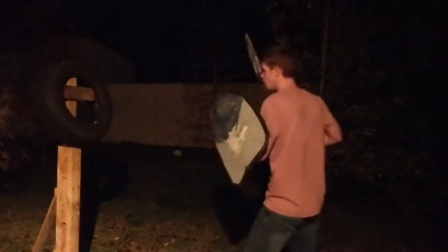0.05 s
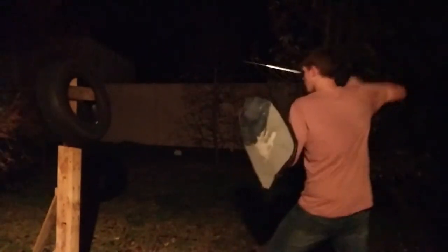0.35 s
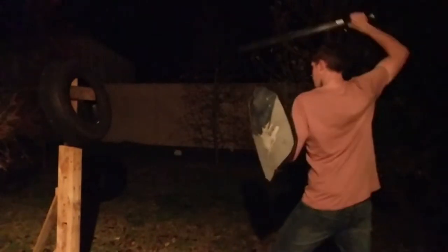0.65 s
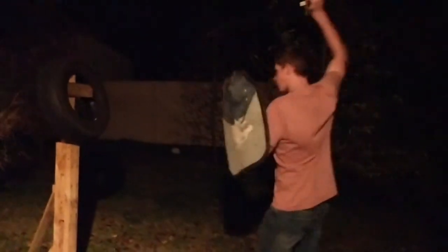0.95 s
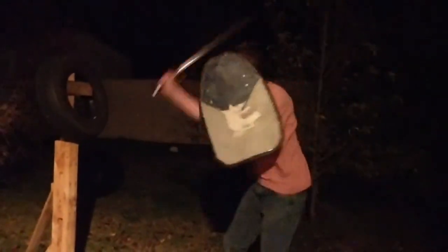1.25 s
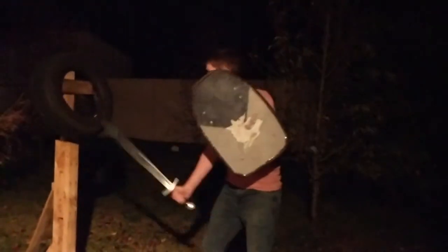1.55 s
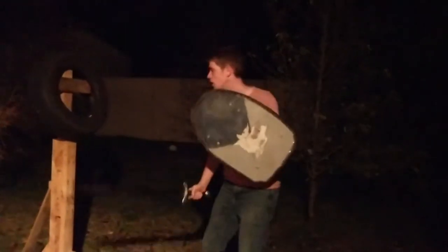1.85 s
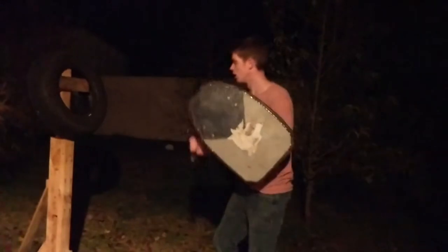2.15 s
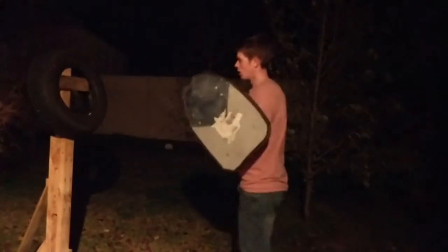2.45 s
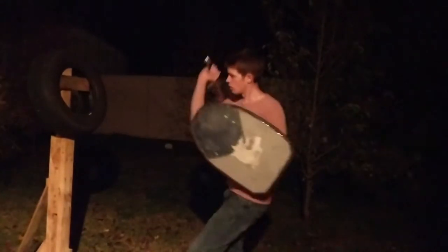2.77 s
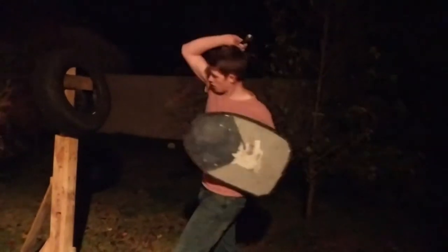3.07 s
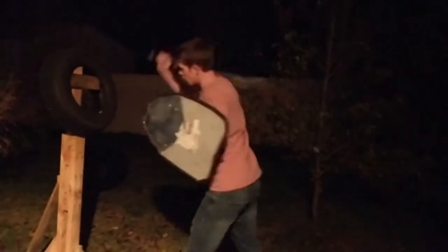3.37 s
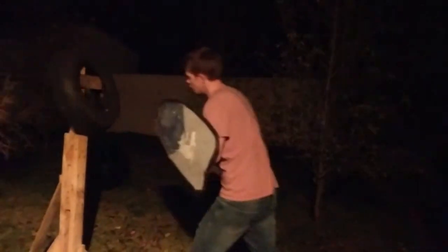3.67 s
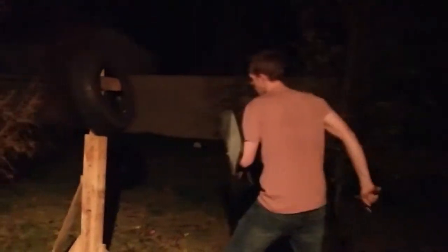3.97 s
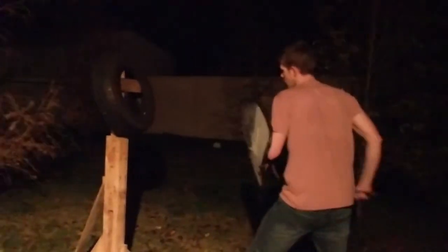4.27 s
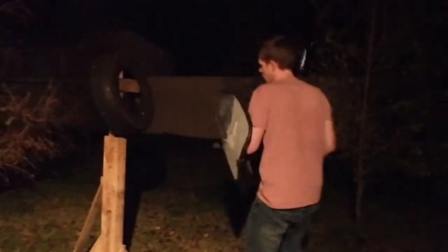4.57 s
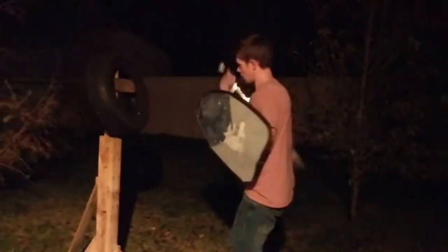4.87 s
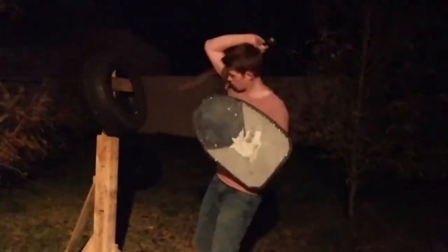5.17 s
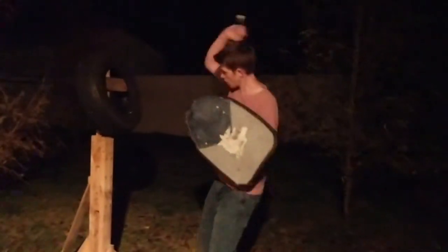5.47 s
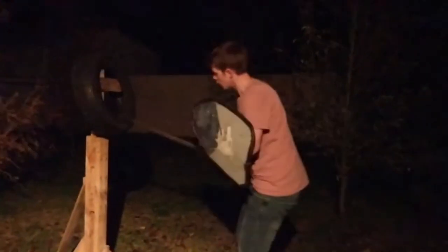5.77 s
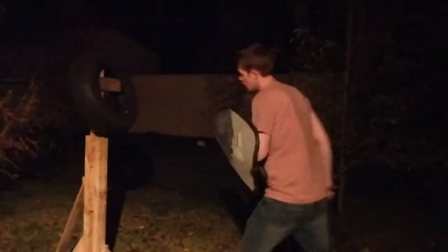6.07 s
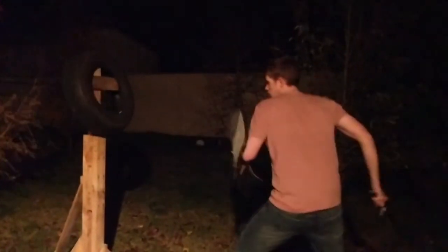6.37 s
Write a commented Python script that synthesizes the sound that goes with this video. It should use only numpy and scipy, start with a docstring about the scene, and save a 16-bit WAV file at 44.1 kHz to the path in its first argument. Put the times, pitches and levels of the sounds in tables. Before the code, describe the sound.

Gusts buffet the microphone in a quiet yard, with soft rustles of leaves and clothing. A sword chops into a tyre with a hollow thud, and the blade sings briefly. The wind drops and a second blow cracks against the rubber. Gusts return before a third, knocking blow with a faint metallic ring. A far machine hums quietly underneath throughout.

```python
"""Sword cuts on a tyre at night

Three cuts land on a tyre on a wooden post in a back yard. The rubber thuds and slaps, the steel sings
as the blade turns; fence and house echo, trees scatter. Gusts rumble and pop at the microphone, shoes
and clothes rustle, a far machine drones. Slow gain control ducks under wind and blows."""
import sys
import numpy as np
from scipy import signal
from scipy.fft import rfft, irfft, next_fast_len
from scipy.io import wavfile
from scipy.ndimage import uniform_filter1d

SR = 44100
rng = np.random.default_rng(int(sys.argv[2]) if len(sys.argv) > 2 else 0)


def transcribe(u):
    """Save the signal u as a 16-bit wav file named by the first command-line argument.

    u: samples, shape (n,) or (channels, n), limited to [-1, 1]; the rate is SR.
    q: integer samples, one column per channel.
    """
    v = np.clip(np.atleast_2d(u).T, -1, 1)
    q = np.round(v * 32767).astype(np.int16)
    wavfile.write(sys.argv[1], SR, q)


N = 283122
T = np.arange(N) / SR

# strongest eddies at the microphone port: t/s, level/dB
STRONG_EDDIES = [(0.038, -18.5), (0.114, -13.5), (0.297, -13), (0.539, -18), (.583, -11.5), (1.003, -15),
                 (1.114, -20.5), (2.181, -21.5), (2.27, -20.5), (2.359, -20), (3.978, -27), (4.078, -25.5),
                 (4.356, -18), (4.375, -13), (4.461, -12), (4.667, -16), (4.77, -20.5), (5.199, -15),
                 (5.265, -18), (5.478, -16.5), (5.58, -13.5), (5.601, -11.5), (5.798, -13), (6.048, -16),
                 (6.146, -17.5), (6.227, -18)]
# centres of thud, knock, slap, crack, clack: f/Hz
REGISTERS_HZ = [265, 450, 1000, 1850, 4200]


def undb(db):
    """Decibels to gain."""
    return 10 ** (np.asarray(db) / 20)


def unit(x):
    """Scale to rms 1."""
    return x / np.sqrt(np.mean(x ** 2))


def shaped(x, colour):
    """Filter by a spectrum of (f/Hz, level/dB) points."""
    hz, db = np.transpose(colour)
    bins_hz = np.maximum(np.fft.rfftfreq(len(x), 1 / SR), 1)
    return irfft(rfft(x) * undb(np.interp(np.log(bins_hz), np.log(hz), db)), len(x))


def noise(colour, size=N):
    """Coloured noise, rms 1."""
    return unit(shaped(rng.standard_normal(size), colour))


def butter(x, hz, kind, order=2):
    """Causal low-pass or high-pass."""
    return signal.sosfilt(signal.butter(order, min(hz, SR / 2 - 1), kind, fs=SR, output="sos"), x)


def smooth(x, span_s):
    """Triangular moving average."""
    k = max(int(span_s * SR), 1)
    return uniform_filter1d(uniform_filter1d(x, k), k)


def walk(rate_hz):
    """Smooth random drift, rms 1."""
    k = int(SR / rate_hz)
    steps = np.repeat(rng.standard_normal(N // k + 1), k)[:N]
    return unit(smooth(steps, 1 / rate_hz))


def fade(t, t60_s):
    """Exponential decay, -60 dB at t60_s."""
    return np.exp(-np.log(1000) * t / t60_s)


def ring(modes, t):
    """Damped sines, one row per mode."""
    return np.array([undb(db) * fade(t, t60_s) * np.sin(2 * np.pi * hz * t) for hz, db, t60_s in modes])


def add(track, start_s, sound):
    """Mix sound into track."""
    i = max(int(start_s * SR), 0)
    track[i:i + len(sound)] += sound[:N - i]


def night(air_db=-51.0):
    """Night air and microphone hiss, with the unsteady drone of a far machine."""
    air_colour = [(25, 9), (60, 25), (130, 8), (250, 12.5), (400, 6), (520, 5), (800, 4), (1300, -1),
                  (3000, -2), (5000, -5), (7500, -11.5), (15500, -17)]  # hiss spectrum: f/Hz, level/dB
    drone_tones = [(100.3, 4.39, -46), (306, 8.17, -64.5), (396.4, 9.36, -60.5)]  # machine hum: f/Hz, width/Hz, level/dB
    out = undb(air_db + .3 * walk(3)) * noise(air_colour)
    for hz, width_hz, db in drone_tones:
        phase = 2 * np.pi * np.cumsum(hz + width_hz / 2 * walk(25)) / SR
        out += np.sqrt(2) * undb(db + 2 * walk(28)) * np.sin(phase)
    return out


def gusts(breeze_db=-45, swing_db=4, breeze_speed=.72, rise_db_per_s=243):
    """Gusts rise from a breeze, sag and die away; returns strength and relative air speed."""
    # gusts: start/s, end/s, level/dB, sag/(dB/s), decay/(dB/s), relative speed
    gust_events = [(0.0, .38, -15, 17, 300, 1.18), (0.499, .61, -17.5, -6, 350, 0.99),
                   (0.73, 1.70, -16, 5, 278.5, 1.06), (2.143, 2.38, -18, 7, 60, .92),
                   (4.322, 5.874, -16, 1.5, 141, 1.22), (5.983, 6.334, -16, 27, 127, 1.19)]
    strength = undb(breeze_db + swing_db * walk(4.6))
    speed = np.full(N, breeze_speed)
    for start_s, end_s, db, sag, decay, gust_speed in gust_events:
        rise_db = rise_db_per_s * np.minimum(T - start_s, 0)
        fall_db = sag * np.clip(T - start_s, 0, end_s - start_s) + decay * np.maximum(T - end_s, 0)
        gust = undb(db + rise_db - fall_db)
        speed = np.where(gust > strength, gust_speed, speed)
        strength = np.maximum(strength, gust)
    return strength, smooth(speed, 0.017)


def puffs(lift_db=0.5, decay_s=.012):
    """Envelope of brief wind swells around the strongest eddies."""
    return sum(undb(db + lift_db) * np.exp(-np.abs(T - s) / decay_s) for s, db in STRONG_EDDIES)


def wind(gust, speed, flutter_db=-22.5, doubling_db=14.5, pops_per_s=220, spread_db=7.0, surge_db=4.5):
    """Large eddies rumble, higher in faster air; small ones pop on top, louder in faster air."""
    rumble_colour = [(15, -37.5), (25, -32), (38, 2), (55, 9.5), (95, 5), (140, 0), (200, -8), (280, -17.5),
                     (420, -30), (800, -93)]  # large eddies at speed 1: f/Hz, level/dB
    flutter_colour = [(140, -14), (240, 3.5), (300, -3), (420, -6), (600, -16.5), (900, -29), (1400, -54.5),
                      (2500, -89)]  # small eddies: f/Hz, level/dB
    surges = undb(surge_db * walk(32))
    turbulence = noise(rumble_colour, size=next_fast_len(2 * N))[:2 * N]
    rumble = np.interp(np.cumsum(speed), np.arange(2 * N), turbulence) * surges
    rumble /= np.sqrt(smooth(rumble ** 2, 0.11))
    pops = (rng.random(N) < pops_per_s / SR) * np.sign(rng.standard_normal(N))
    pops *= undb(spread_db * rng.standard_normal(N))
    flutter = shaped(pops, flutter_colour) * surges
    flutter /= np.sqrt(smooth(flutter ** 2, 0.25) + 1e-18)
    flutter_gain = undb(flutter_db + doubling_db * np.log2(speed))
    return np.hypot(gust, puffs()) * rumble + flutter_gain * gust * flutter


def stray_eddies(gust, rate_per_s=4.6, offset_db=-13, spread_db=3):
    """Weaker eddies at random times, level following the gust: rows of t/s, level/dB."""
    onsets = np.flatnonzero(rng.random(N) < rate_per_s / SR)
    levels_db = 20 * np.log10(gust[onsets]) + offset_db + spread_db * rng.standard_normal(N)[onsets]
    return list(zip(T[onsets], levels_db))


def buffets(gust, eddy_s=0.0036, wake_s=0.012, wake_db=-19, gain_db=2, port_hz=70, top_hz=1250):
    """Pressure builds, flips as an eddy crosses the microphone port, and relaxes in a ragged wake."""
    out = np.zeros(N)
    t = T[:SR // 16] - 1 / 32
    for s, db in list(STRONG_EDDIES) + stray_eddies(gust):
        # stronger eddies cross faster: an octave per 8.5 dB
        edge_hz = np.clip(299 * 2 ** ((db + 20) / 8.5), 160, 1200)
        flip = -np.tanh(2 * np.pi * edge_hz * t) / np.cosh(2 * t / eddy_s)
        colour = [(edge_hz / 4, -10), (edge_hz / 2, 0), (edge_hz, -5), (2 * edge_hz, -22), (5000, -70)]
        wake = undb(wake_db) * noise(colour, size=len(t)) / np.cosh(2 * t / wake_s)
        add(out, s + t[0], undb(db) * (flip + wake))
    out = butter(out, top_hz, "low", order=3)
    return undb(gain_db) * butter(out, port_hz, "high", order=1)


def footwork(grain_db=1.5, snap_t60_s=0.025):
    """Shoes brush grass and dry leaves, a shirt slides; leaves and gear snap."""
    rustles = [(0.045, -53, 0.016, 13700), (0.108, -54.5, 0.032, 13000), (0.495, -51, 0.034, 7000),
               (0.733, -52.5, 0.095, 6900), (1.314, -47.5, 0.1, 8400), (2, -53, 0.075, 6000),
               (2.218, -48.5, 0.1, 6900), (2.67, -55, 0.48, 8000), (2.782, -48, 0.083, 18000),
               (3.445, -54.5, 0.066, 14000), (4.258, -49.5, 0.14, 8900), (4.626, -52, 0.034, 10000),
               (5.023, -52, 0.24, 6457), (5.78, -50.5, 0.033, 10030), (6.285, -56, 0.27, 5940)]  # swishes: t/s, level/dB, half-width/s, low-pass/Hz
    rustle_colour = [(500, -2.5), (1200, -4.5), (3500, -1.5), (6500, -4.5), (10000, -6.5), (15500, -7)]  # swish spectrum: f/Hz, level/dB
    snaps = [(.29, -46.5, 1730), (0.951, -47, 4790), (1.209, -35, 3480), (1.275, -39.5, 3770),
             (2.668, -41, 2230), (4.158, -51, 11120), (5.499, -45, 3090), (5.764, -45, 5023),
             (5.861, -44, 8820)]  # dry snaps: t/s, level/dB, f/Hz
    brush = unit(noise(rustle_colour) * undb(grain_db * walk(230)))
    out = np.zeros(N)
    for s, db, width_s, top_hz in rustles:
        swell = undb(db) * np.exp(-((T - s) / width_s) ** 2)
        out += swell * butter(brush, top_hz, "low", order=1)
    t = T[:SR // 10]
    for s, db, hz in snaps:
        burst = noise([(hz / 4, -20), (hz, 0), (hz * 3, -16)], size=len(t))
        add(out, s, undb(db) * fade(t, snap_t60_s) * burst)
    return out


def yard(direct, scattered, tail_db=-13, tail_t60_s=0.62, build_s=0.087, echo_top_hz=2600):
    """Direct sound, its hard echoes, and a thin tail scattered by trees and bushes."""
    echoes = [(.0058, -18.5), (0.0215, -15.5), (0.0231, -23.5), (.05, -20), (.076, -25.5), (0.107, -24)]  # ground, shield, fence, house: delay/s, level/dB
    tree_colour = [(100, -19), (300, 5), (700, -7), (1300, -7.5), (2200, -1.5), (3500, -4), (6000, -5),
                   (12000, -9.5)]  # scatter spectrum: f/Hz, level/dB
    t = T[:SR]
    walls = np.zeros(SR)
    for delay_s, db in echoes:
        add(walls, delay_s, undb([db]))
    walls = butter(walls, echo_top_hz, "low")
    trees = noise(tree_colour, size=SR) * fade(t, tail_t60_s) * (1 - np.exp(-t / build_s))
    trees *= undb(tail_db) / np.sqrt(np.sum(trees ** 2))
    return direct + (signal.fftconvolve(direct, walls) + signal.fftconvolve(scattered, trees))[:N]


def register_gain(hz, balance_db):
    """Gain at hz, interpolated between a blow's register levels."""
    return undb(np.interp(np.log(hz), np.log(REGISTERS_HZ), balance_db))


def tyre_thud(t, balance_db, give_hz=3400, cancel_hz=175):
    """Tyre and post ring; yielding rubber rounds the pulse, deep bass cancels around the open tyre."""
    tyre_modes = [(192.5, -23.5, 0.51), (242.6, -14.5, 0.098), (271, -6, 0.059), (306.6, -18, 0.15),
                  (367, -18, 0.16), (407, -22, 0.18), (463, -25, 0.17), (531, -26.5, 0.15),
                  (582, -23.5, 0.076), (814, -12, 0.012), (942, -6.5, 0.013), (1151, -15.5, 0.084),
                  (1185, -34, 0.036), (1540, -24.5, 0.041), (1846, -19, 0.018), (1910, -21, 0.014),
                  (2225, -29, 0.02), (2280, -25, 0.011), (2800, -43, 0.02), (3420, -39, 0.13)]  # tyre and post: f/Hz, level/dB, t60/s
    modes = np.array(tyre_modes)
    thud = register_gain(modes[:, 0], balance_db) @ ring(modes, t)
    return -butter(butter(thud, give_hz, "low"), cancel_hz, "high", order=4)


def tread_slap(t, balance_db, slap_db=-14, slap_t60_s=0.033, shudder_db=-26, shudder_t60_s=0.27):
    """A sharp slap, then the tread shudders against the edge."""
    slap_colour = [(140, -33), (270, 1.5), (420, -2.5), (640, -6), (1150, 5), (2000, -9.5), (3200, -16.5),
                   (4200, -19), (5200, -31), (8000, -39), (15000, -61)]  # steel on rubber: f/Hz, level/dB
    grain = shaped(noise(slap_colour, size=len(t)), list(zip(REGISTERS_HZ, balance_db)))
    return grain * (undb(slap_db) * fade(t, slap_t60_s) + undb(shudder_db) * fade(t, shudder_t60_s))


def facing_db(t, clear_s, edge_db=-20, flat_db=7, draw_s=.08, turns=3.66, roll_s=.77, dip_db=30):
    """Quiet edge-on, the blade swells when drawn clear, then rolls ever slower, dipping at each edge."""
    drawn = np.clip((t - clear_s) / draw_s + 1, 0, 1)
    angle = 2 * np.pi * turns * (1 - np.exp(-t / roll_s))
    edge_on = (1 - np.abs(np.cos(angle))) ** 2
    return edge_db + drawn * (flat_db - edge_db - dip_db * edge_on)


def blade_ring(t, balance_db, contact_hz, clear_s, favour_db=10, width_oct=.16):
    """Steel modes ring; those moving most at the point of contact are struck hardest."""
    blade_modes = [(1787, -36.5, 2.02, 0.35), (2150, -30.5, 0.59, 0.23), (2760, -32.5, 0.29, 0),
                   (3090, -42, 0.63, 0.2), (3250, -38, 0.36, 0.26), (3760, -39, 0.21, 0.33),
                   (4000, -46, 0.18, 0), (4485, -51, 0.45, 0), (4995, -45, 0.32, 0.2),
                   (5530, -32.5, 0.07, 0), (6160, -31, 0.07, 0), (6470, -38, 0.73, 1), (7130, -50, 0.76, 1)]  # steel blade: f/Hz, level/dB, t60/s, share of facing_db (0-1)
    modes = np.array(blade_modes)
    hz, facing_share = modes[:, 0], modes[:, 3]
    favoured = np.exp(-(np.log2(hz / contact_hz) / width_oct) ** 2)
    gains = undb(favour_db * favoured) * register_gain(hz, balance_db)
    swell = undb(np.outer(facing_share, facing_db(t, clear_s)))
    return gains @ (swell * ring(modes[:, :3], t))


def sword(click_t60_s=0.059, click_cut_hz=9100):
    """Each cut excites tyre and blade; how squarely it lands sets the register balance."""
    # cuts: t/s, thud/dB, knock/dB, slap/dB, crack/dB, clack/dB, tread scuff/dB, blade ring/dB,
    # favoured f/Hz, overload click/dB, time until drawn clear/s
    cuts = [(1.4334, 2.5, -3, -1, -4.5, -4.5, 1, -2, 3840, -56, 0.235),
            (3.6106, -2, 1.5, 1, 3.5, -4.5, -1.5, -24, 3100, -38, .3),
            (5.8282, 1, 6, -2.5, 1.5, 1.5, -1, -16, 4520, -52, 0.45)]
    rubber, smack, steel = np.zeros((3, N))
    t = T[:SR]
    for s, *balance_db, scuff_db, ring_db, contact_hz, click_db, clear_s in cuts:
        add(rubber, s, tyre_thud(t, balance_db))
        add(smack, s, undb(scuff_db) * tread_slap(t, balance_db))
        # brief high noise burst, standing for a loud blow overloading the recorder
        overload_click = fade(t, click_t60_s) * butter(rng.standard_normal(SR), click_cut_hz, "high")
        add(rubber, s, undb(click_db) * overload_click)
        add(steel, s, undb(ring_db) * blade_ring(t, balance_db, contact_hz, clear_s))
    return rubber, smack, steel


def scene(blow_db=3, rubber_scatter_db=-21, steel_scatter_db=-6):
    """Blows in the yard over footwork, night air and wind; mono."""
    rubber, smack, steel = sword()
    scattered = smack + undb(steel_scatter_db) * steel + undb(rubber_scatter_db) * rubber
    blows = yard(rubber + smack, scattered) + steel
    gust, speed = gusts()
    return (undb(blow_db) * blows + footwork() + night() + wind(gust, speed) + buffets(gust))[None]


def record(dry, threshold_db=-41, slope=0.2, follow_s=0.15, ceiling=1.3, low_cut_hz=37, top_hz=15750):
    """Microphone low cut, slow gain control, soft clipping, steep top cut."""
    x = butter(dry[0], low_cut_hz, "high", order=4)
    level_db = 10 * np.log10(np.maximum(smooth(x ** 2, 0.0023), 1e-12))
    over_db = smooth(np.maximum(level_db - threshold_db, 0), follow_s)
    x = ceiling * np.tanh(x * undb(-slope * over_db) / ceiling)
    return signal.sosfilt(signal.ellip(10, .2, 80, top_hz, fs=SR, output="sos"), x)[None]


dry = scene()
out = record(dry)
transcribe(out)
```